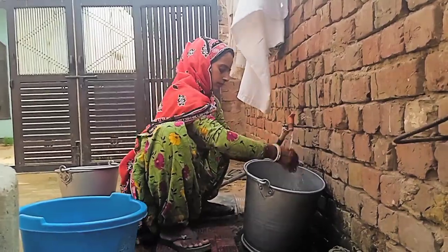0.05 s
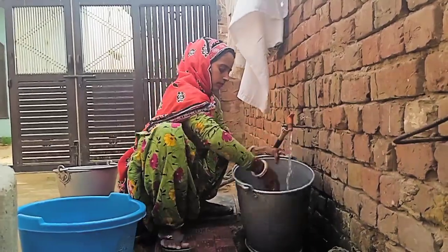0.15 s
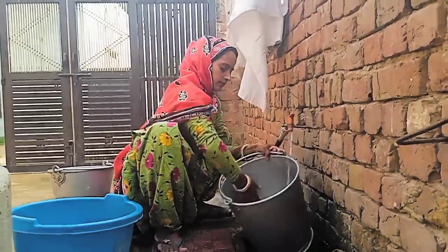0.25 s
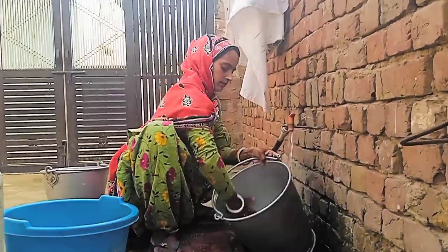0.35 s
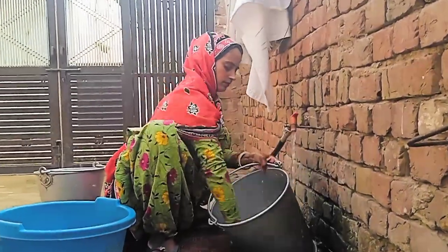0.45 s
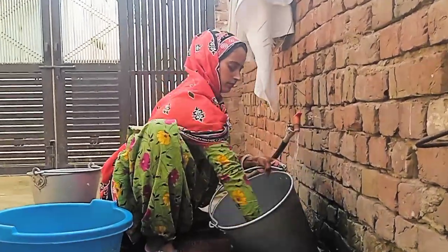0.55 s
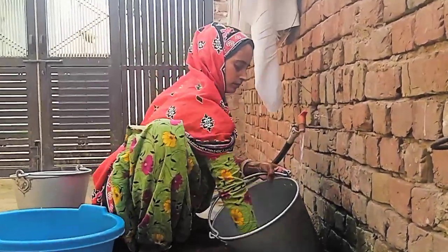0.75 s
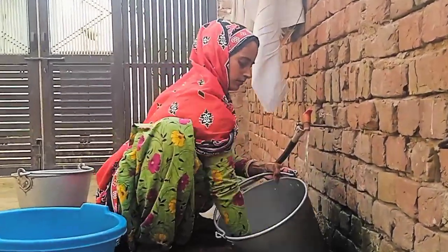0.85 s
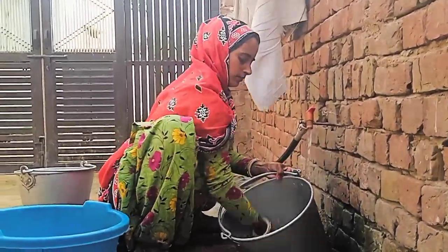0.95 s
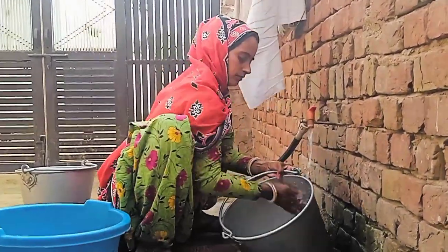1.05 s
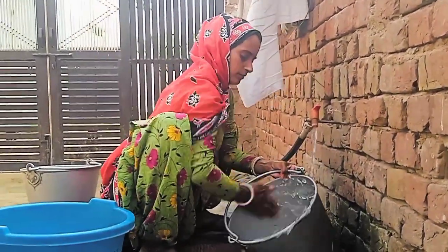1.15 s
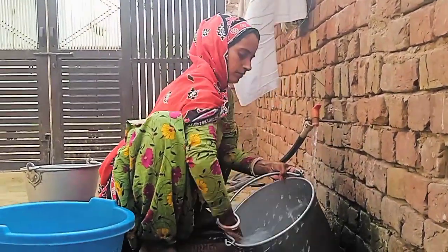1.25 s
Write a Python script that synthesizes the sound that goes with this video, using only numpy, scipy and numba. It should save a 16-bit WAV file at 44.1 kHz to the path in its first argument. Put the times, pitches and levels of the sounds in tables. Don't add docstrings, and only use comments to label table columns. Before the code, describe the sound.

Water slaps and sloshes in a thin steel pail, with a hollow knock, in a courtyard

```python
import sys
import numpy as np
from scipy import signal
from scipy.fft import rfft, irfft
from scipy.io import wavfile
from scipy.ndimage import uniform_filter1d
from numba import njit

SR = 44100
rng = np.random.default_rng(int(sys.argv[2]) if len(sys.argv) > 2 else 0)


def transcribe(signal):
    frames = np.atleast_2d(signal).T
    limited = np.clip(frames, -1, 1)
    pcm = np.round(limited * 32767).astype(np.int16)
    wavfile.write(sys.argv[1], SR, pcm)


def voltage_ratio(level):
    return 10 ** (np.asarray(level, float) / 20)


N = 57330
T = np.arange(N) / SR

# (time [s], level [dB], spray over bubbles [dB], hold [s], release t60 [s])
SLAPS = [(0.014, -31.5, 5, 0.019, 0.059), (0.0492, -23, -1.5, 0.0047, 0.036),
         (0.055, -27.5, 1, 0.0046, 0.059), (0.0896, -33, 2.5, 0.013, 0.032),
         (0.095, -34.5, -2.5, 0.016, 0.059), (0.13, -27, 1, 0.0031, 0.073),
         (0.2038, -36.5, -6, 0.004, 0.045), (0.2254, -21, -0.5, 0.01, 0.062),
         (0.334, -21, 3, 0.0066, 0.051), (0.449, -43, 12.5, 0.02, 0.029), (0.478, -23, -9.5, 0.0093, 0.068),
         (0.489, -19.5, 1.5, 0.013, 0.027), (0.703, -41, -5, 0.0042, 0.025), (0.797, -39, -2, 0.0092, 0.04),
         (0.894, -39.5, 4, 0.0063, 0.042), (0.941, -37, 10, .005, .04), (.961, -40, -4, 0.0073, .04),
         (1.005, -44.5, 17, 0.014, 0.05), (1.035, -46, 8, .004, .04), (1.1912, -37, -7, 0.013, 0.037),
         (1.214, -41.5, -16, 0.01, 0.07), (1.278, -30.5, -12, 0.03, 0.11),
         (1.2915, -24.5, -1.5, .012, 0.069)]
# (time [s], flow level [dB], spray over bubbles [dB])
SWIRL_FLOW = [(0, -52, -24.5), (.15, -45, -6), (0.323, -46.5, 0.5), (0.378, -32.5, -15.5), (.44, -45.5, -1),
              (.53, -36, -10.5), (0.581, -40, -1.5), (0.642, -49.5, -8), (0.767, -52, -3),
              (0.821, -40, -5.5), (0.902, -42.5, 3), (0.943, -37.5, 6), (.97, -36.5, 6.5),
              (0.993, -36.5, 3), (1.045, -44, 9), (1.068, -43.5, -2), (1.18, -56.5, 1.5),
              (1.27, -55.5, -0.5)]
# (time [s], strength [dB], contact [s], free ringing before damping [s])
BLOWS = [(.022, -39.5, 0.002, 0.033), (.056, -49.5, 0.0026, 0.027), (0.367, -7.5, 0.0061, .058),
         (.479, -22, 0.0023, 0.029), (.486, -22.5, 0.0043, 0.064), (.794, -33, 0.0043, .03),
         (.832, -37, 0.007, 0.046), (.855, -42, 0.0034, .035), (0.954, -56, 0.0037, 0.022),
         (.993, -14.5, 0.0075, 0.072), (1.075, -42, 0.0048, 0.06), (1.191, -37.5, 0.0014, 0.063),
         (1.277, -23, 0.0071, .05)]
# (frequency [Hz], gain [dB], t60 [s])
BOOM_MODES = [(124, -9.5, 0.12), (160, -5.5, 0.065), (213, -6, 0.058), (253.4, 0, 0.18),
              (275.5, -9.5, 0.14), (335, -12, 0.19), (515, -22, 0.3)]
# (frequency [Hz], gain [dB], t60 [s])
WET_BASE_MODES = [(135, -1, 0.099), (210, -3.5, 0.031), (308, -1.5, 0.034), (400, -3.5, 0.015),
                  (510.6, -11.5, 0.048), (612, -9.5, 0.023), (751, -9, 0.048)]
# (frequency [Hz], gain [dB], t60 [s])
WALL_MODES = [(850, -2, 0.16), (1333, 2, 0.13), (1430, -13.5, 0.14), (1740, -32, 0.14), (1817, -2, 0.2),
              (1945, -10, 0.29), (2040, -21, 0.12), (2310, -9, 0.089), (2525, 3, 0.11), (2700, -7.5, 0.18),
              (2864, 0.5, 0.14), (3333, 5, 0.026), (4240, 8.5, 0.024), (6500, 8, 0.014)]
# (frequency [Hz], density [dB per Hz])
WATER_SPECTRUM = [(150, 4), (400, -0.5), (1000, -1.5), (1900, 4), (2900, -1), (3600, -6.5), (6800, -8),
                  (8500, -16)]
# (frequency [Hz], gain [dB])
TREBLE_FALL = [(7500, -3.5), (9500, -13), (12000, -26.5), (13600, -24), (14600, -12), (15900, -9)]
# (frequency [Hz], density [dB per Hz])
YARD_SPECTRUM = [(40, -7), (125, 24.5), (400, 0), (1850, -6), (3560, -41), (6170, -6), (9000, -15),
                 (13000, -25), (15300, -4)]
# (time [s], pitch [Hz], level [dB], t60
# [s])
WATER_TONES = [(.018, 6500, -29.5, 0.035), (.016, 2475, -28.5, 0.04), (.05, 850, -21.5, 0.022),
               (.056, 1774, -32.5, 0.068), (.057, 1290, -30, 0.034), (.055, 2770, -28, 0.035),
               (.092, 5800, -35, 0.02), (.132, 2700, -22, 0.021), (.137, 1380, -26, 0.03),
               (.2035, 2600, -31, .03), (.228, 4360, -34, .06), (.336, 4280, -29, .05),
               (.336, 4840, -32, .04), (.14, 1762, -34, 0.072), (.226, 1430, -30, 0.037),
               (.228, 2656, -29.5, 0.081), (.229, 298.4, -33.5, 0.24), (.241, 1430, -29, 0.078),
               (.309, 1670, -32, 0.02), (.332, 385, -17.5, 0.045), (.332, 499, -20, .045),
               (.336, 583, -27, .05), (.345, 292, -38, 0.039), (.48, 583, -32, 0.036),
               (.485, 916, -30, 0.058), (.497, 854, -31, 0.14), (.333, 1766, -20.5, 0.087),
               (.337, 1945, -20, 0.05), (.34, 848, -31.5, 0.1), (.483, 1688, -25.5, 0.072),
               (.497, 2835, -21.5, 0.029), (.5, 119.4, -16.5, 0.3), (.52, 345, -26.5, 0.093),
               (.368, 515, -37, .25), (.41, 328, -32.5, .15), (.42, 110, -22, .08), (.1, 160, -35, .1),
               (.024, 300, -43, .06), (.26, 1950, -38, .15), (.26, 850, -44, .15),
               (.793, 735, -30, 0.079), (.825, 700, -38, 0.057), (0.71, 190, -31, 0.11),
               (1.02, 500, -47, 0.12), (.898, 2470, -32, 0.032), (.9395, 2100, -29, 0.033),
               (.945, 3900, -31, .05), (.975, 2050, -35, 0.044), (.99, 1500, -40.5, 0.037),
               (.86, 746, -40.5, 0.14), (.93, 730, -39, .12), (.93, 960, -43, 0.095),
               (.955, 980, -37, 0.076), (.765, 568, -42.5, 0.1), (0.8, 1200, -35, 0.13),
               (.957, 2850, -26.5, 0.054), (.962, 1960, -32.5, 0.11), (.964, 2500, -27.5, 0.045),
               (1.011, 6970, -26.5, .03), (1.014, 2700, -30, 0.025), (1.035, 5600, -29, 0.024),
               (1.1, 735, -50.5, 0.16), (1.2, 750, -38, 0.05), (1.195, 2043, -42, .04),
               (1.218, 2000, -45, 0.046), (1.15, 1900, -45.5, 0.066), (1.235, 520, -50.5, .12),
               (1.262, 660, -47, 0.086), (1.28, 860, -32, 0.072), (1.291, 2140, -30, 0.042),
               (1.291, 2800, -27.5, .05), (.703, 1880, -41.5, 0.049), (.82, 765, -38.5, 0.08)]
# (time [s], level [dB], t60 [s])
MIST_BURSTS = [
    (.05, -58, .05),
    (0.333, -41, 0.06),
    (.485, -46, 0.089),
]

ATTACK_S, SPLASH_DB, SWIRL_DB = 0.0022, -6, -2
CRACK_DB, CRACK_S = -1.5, 0.0018
SPRAY_FROM_HZ = 2890
DEEP_TO_HZ, DEEP_DB, DEEP_PER_SPRAY = 640, -2, 0.57
BUBBLE_CYCLES, BUBBLE_GLIDE, BUBBLE_SCATTER_DB, BUBBLE_CAP_DB = 14, 0.17, 3, 10
FIZZ_DB, FIZZ_FLICKER_DB = -3, 0.6
WALL_DB, SLOSH_DB = -39.5, -28
PORT_HZ, PORT_DB, PORT_SPLASH_DB = 14300, -21, -12
DAMPED_DB, DAMP_S = -8.5, 0.0047
LONGEST_RING = int(0.45 * SR)
NOTE_SWELL_CYCLES, NOTE_MAX_CYCLES = 3.43, 190
NOTE_WAVER_DB, NOTE_WOBBLE = 2.5, 0.006
MIST_FROM_HZ = 7400
ECHO_DB, ECHO_T60_S = -14.5, 0.3
YARD_DB, YARD_FLICKER_DB = -57, 1.5
SIDE_FROM_HZ, SIDE_DB = 7300, -8
LOW_CUT_HZ, TOP_HZ = 227, 15850


def unit(x):
    return x / np.sqrt(np.mean(x ** 2))


def colour(x, table):
    hz = np.fft.rfftfreq(N, 1 / SR) + 1
    point_hz, point_db = np.array(table, float).T
    gain = voltage_ratio(np.interp(np.log(hz), np.log(point_hz), point_db))
    return irfft(rfft(x) * gain, N)


def butter(x, order, hz, kind):
    return signal.sosfilt(signal.butter(order, hz, kind, fs=SR, output="sos"), x)


def walk(rate):
    hold = int(SR / rate)
    steps = np.repeat(rng.standard_normal(N // hold + 1), hold)
    return unit(uniform_filter1d(steps, hold)[:N])


def ring(force, modes):
    out = 0
    for hz, db, t60 in modes:
        r = np.exp(-np.log(1000) / (t60 * SR))
        w = 2 * np.pi * hz / SR
        out = out + voltage_ratio(db) * signal.lfilter([0, r * np.sin(w)], [1, -2 * r * np.cos(w), r * r], force)
    return out


@njit
def chirps(n, start, turn, size, cycles, glide):
    out = np.zeros(n)
    for k in range(len(start)):
        span = cycles[k] * 2 * np.pi / turn[k]
        phase = 0.
        for i in range(min(int(span), n - start[k])):
            phase += turn[k] * (1 + glide * i / span)
            out[start[k] + i] += size[k] * np.exp(-5 * i / span) * np.sin(phase)
    return out


def water(count):
    when, pitch, scatter, length = rng.random((count, 4)).T
    hz = 300 * 50 ** pitch
    scatter_db = np.minimum(-BUBBLE_SCATTER_DB * np.log(1 - scatter), BUBBLE_CAP_DB)
    size = voltage_ratio(scatter_db) * hz / 2000
    cycles = BUBBLE_CYCLES * (0.5 + length) * (1 + hz / 2500)
    start = (when * N).astype(np.int64)
    pops = chirps(N, start, 2 * np.pi * hz / SR, size, cycles, BUBBLE_GLIDE)
    fizz = rng.standard_normal(N) * voltage_ratio(FIZZ_FLICKER_DB * walk(600))
    return unit(colour(unit(pops) + voltage_ratio(FIZZ_DB) * fizz, WATER_SPECTRUM))


def water_powers():
    t, db, spray = np.array(SWIRL_FLOW, float).T
    spray = np.interp(T, t, spray)
    body = voltage_ratio(np.interp(T, t, db) + SWIRL_DB) ** 2
    gulp = body * voltage_ratio(DEEP_DB - DEEP_PER_SPRAY * spray) ** 2
    swirl_spray = body * voltage_ratio(spray) ** 2
    all_spray = swirl_spray
    for s, db, spray, hold, t60 in SLAPS:
        age = np.maximum(T - s, 0)
        decay = voltage_ratio(db + SPLASH_DB - 60 * np.maximum(age - hold, 0) / t60)
        power = (decay * np.minimum(age / ATTACK_S, 1)) ** 2
        power = power * (1 + voltage_ratio(CRACK_DB) ** 2 * np.exp(-age / CRACK_S))
        gulp = gulp + power * voltage_ratio(DEEP_DB - DEEP_PER_SPRAY * spray) ** 2
        body = body + power
        all_spray = all_spray + power * voltage_ratio(spray) ** 2
    return gulp, body, all_spray, swirl_spray


def rinse():
    gulp_power, body_power, spray_power, swirl_spray = water_powers()
    wet = water(count=9000)
    body = unit(butter(wet, 3, SPRAY_FROM_HZ, "low"))
    spray = unit(butter(wet, 3, SPRAY_FROM_HZ, "high"))
    gulp_filter = signal.butter(3, DEEP_TO_HZ, "low", fs=SR, output="sos")
    gulp = signal.sosfiltfilt(gulp_filter, body)
    drops = gulp * np.sqrt(gulp_power) + (body - gulp) * np.sqrt(body_power)
    drops = drops + spray * np.sqrt(spray_power)

    strike = rng.standard_normal(N) * voltage_ratio(walk(300))
    wall = voltage_ratio(WALL_DB) * ring(strike * np.sqrt(body_power), WALL_MODES)
    slosh = voltage_ratio(SLOSH_DB) * ring(strike * np.sqrt(gulp_power), WET_BASE_MODES)

    hiss = unit(butter(rng.standard_normal(N), 10, PORT_HZ, "high"))
    hiss_power = swirl_spray + (spray_power - swirl_spray) * voltage_ratio(PORT_SPLASH_DB) ** 2
    return colour(drops + wall + slosh, TREBLE_FALL) + voltage_ratio(PORT_DB) * hiss * np.sqrt(hiss_power)


def notes():
    out = np.zeros(N)
    waver = [walk(70.85) for _ in range(4)]
    for k, (s, hz, db, t60) in enumerate(WATER_TONES):
        span = slice(int(s * SR), int(s * SR) + LONGEST_RING)
        age = np.maximum(T[span] - s, 0)
        level = db - 60 * age / min(t60, NOTE_MAX_CYCLES / hz) + NOTE_WAVER_DB * waver[k % 4][span]
        swell = 1 - np.exp(-age * hz / NOTE_SWELL_CYCLES)
        cycles = hz * np.cumsum(1 + NOTE_WOBBLE * waver[(k + 1) % 4][span]) / SR
        out[span] += voltage_ratio(level) * swell * np.sin(2 * np.pi * cycles)
    return out


def knocks():
    out = np.zeros(N)
    for s, db, contact, free in BLOWS:
        span = slice(int(s * SR), int(s * SR) + LONGEST_RING)
        age = T[span] - s
        x = np.clip(age / contact, 0, 1)
        push = -np.sin(2 * np.pi * x) * np.sin(np.pi * x) * voltage_ratio(db) * 3 / (contact * SR)
        damping = voltage_ratio(DAMPED_DB * np.clip((age - free) / DAMP_S, 0, 1))
        out[span] += ring(push, BOOM_MODES) * damping
    return out


def mist():
    env = np.zeros(N)
    for s, db, t60 in MIST_BURSTS:
        opening = np.clip((T - s) / ATTACK_S, 0, 1)
        env += voltage_ratio(db - 60 * np.maximum(T - s, 0) / t60) * opening
    return env * unit(butter(rng.standard_normal(N), 3, MIST_FROM_HZ, "high"))


def echo(near):
    t = T[:SR // 2]
    tail = rng.standard_normal(SR // 2) * voltage_ratio(-60 * t / ECHO_T60_S) * (t > 0.004)
    tail = tail / np.sqrt(np.sum(tail ** 2))
    return voltage_ratio(ECHO_DB) * signal.fftconvolve(near, tail)[:N]


def yard():
    level = voltage_ratio(YARD_DB + YARD_FLICKER_DB * walk(8.8))
    return unit(colour(rng.standard_normal(N), YARD_SPECTRUM)) * level


def scene():
    near = rinse() + notes() + knocks() + mist()
    mid = near + echo(near) + yard()
    side = voltage_ratio(SIDE_DB) * butter(mid, 7, SIDE_FROM_HZ, "high") * walk(900)
    return np.array([mid + side, mid - side])


def roll_off(x):
    return signal.sosfilt(signal.butter(12, 16970, fs=SR, output="sos"), x)


def record(dry):
    x = butter(dry, 2, LOW_CUT_HZ, "high")
    x = signal.sosfilt(signal.ellip(14, 0.2, 70, TOP_HZ, fs=SR, output="sos"), x)
    return roll_off(x)


dry = scene()
out = record(dry)
transcribe(out)
```